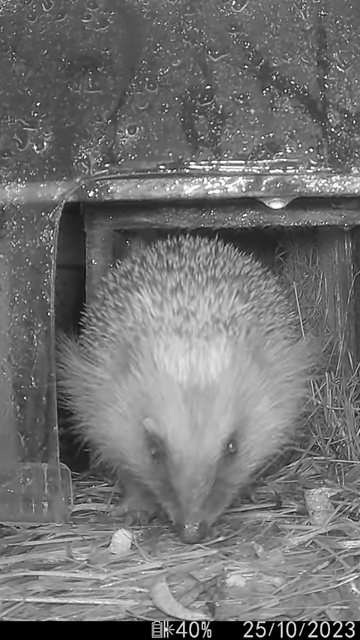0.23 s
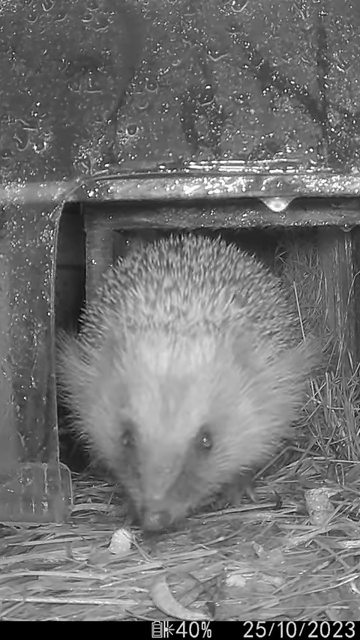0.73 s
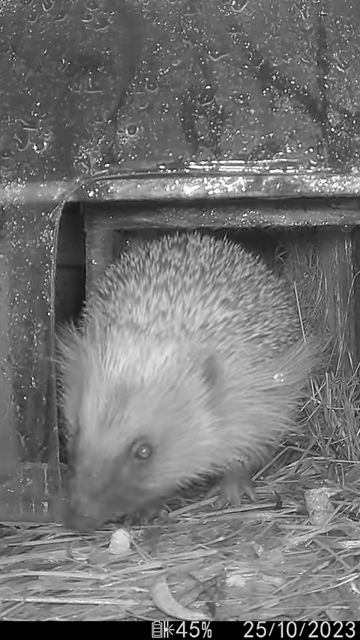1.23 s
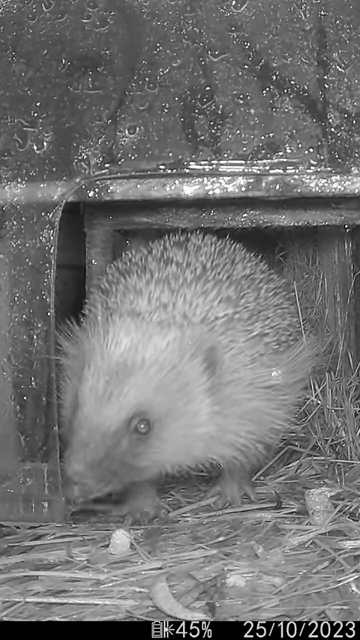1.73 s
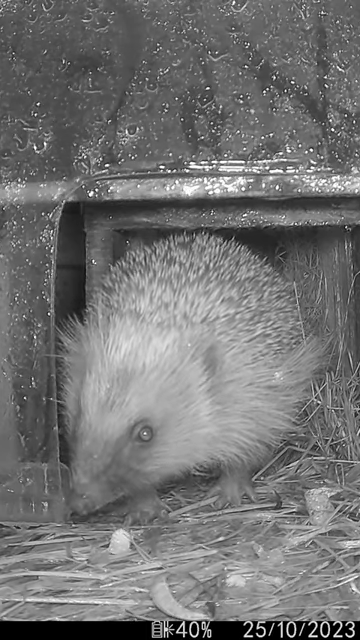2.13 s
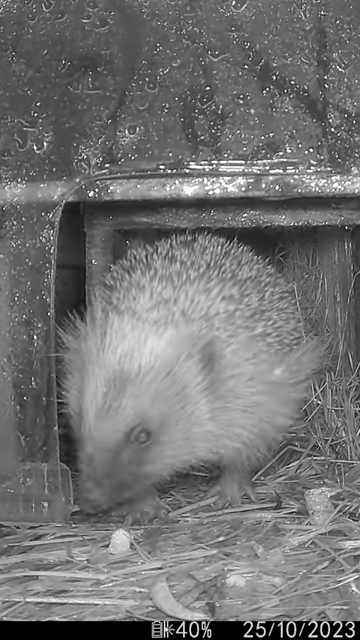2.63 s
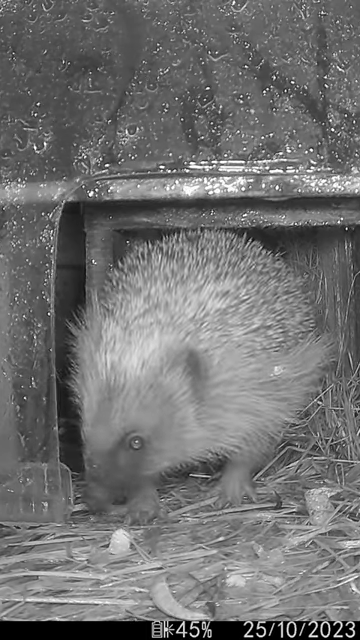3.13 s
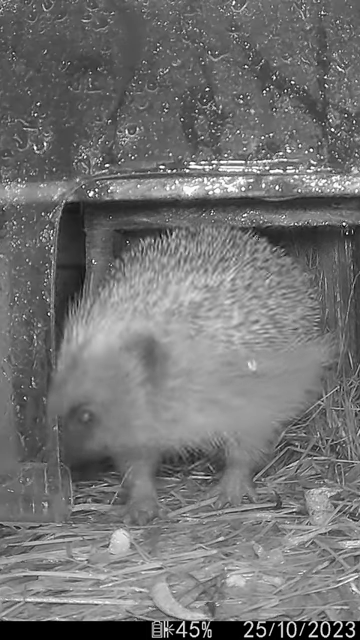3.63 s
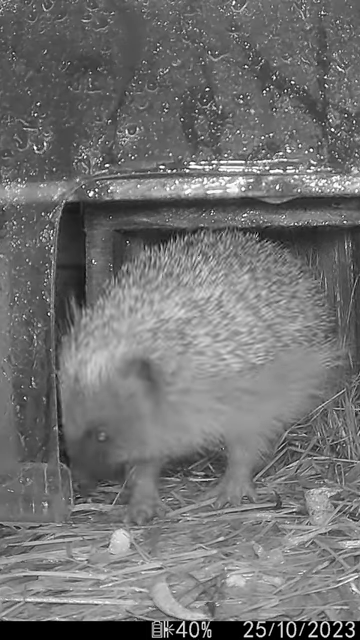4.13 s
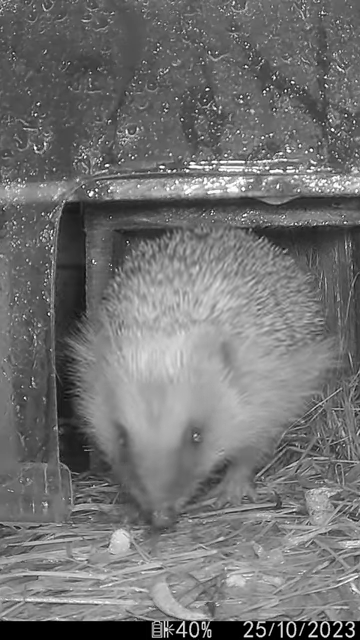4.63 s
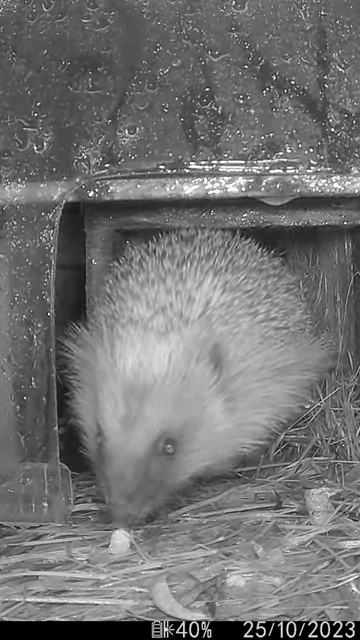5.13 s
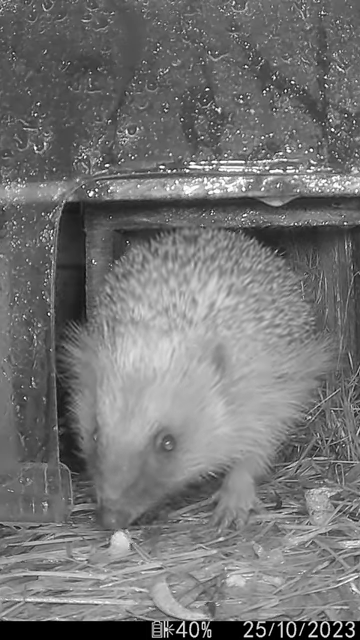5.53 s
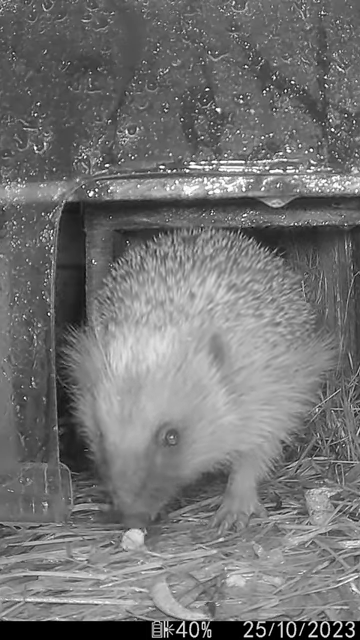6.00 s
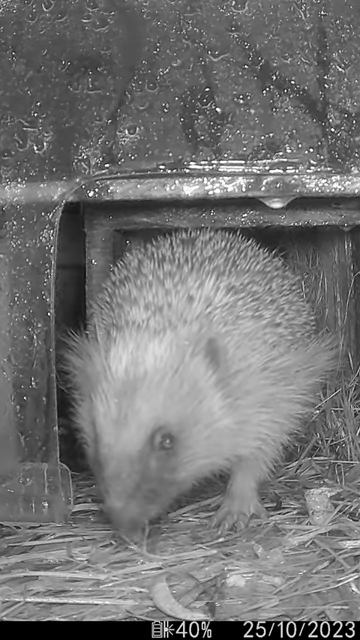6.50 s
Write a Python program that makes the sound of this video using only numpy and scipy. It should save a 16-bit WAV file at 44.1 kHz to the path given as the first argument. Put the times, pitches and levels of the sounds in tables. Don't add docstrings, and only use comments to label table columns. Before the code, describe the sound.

Inside a small wooden box at night, a hedgehog moves in dry straw, close to a small microphone. Right away, at 0.1-0.25 s, stout stalks crack over soft low thuds on the floor board, then a bright, thin ping at 0.6 s. Fine rustling of tiny cracks continues with light ticks and knocks until about 1.5 s, when a sharp hollow snap and thud start another cluster lasting to roughly 2.15 s. A quieter stretch of rustle follows, with single snaps near 2.8, 3.1 and 3.4 s. From 3.7 to 4.1 s comes the densest, loudest burst: rapid cracks, crunchy rustle, thumps and a woody ping at 4 s. It settles quickly by 4.5 s. The rest is nearly still: faint ticks, a small snap cluster around 5.7-5.9 s, a tiny one at 6.7 s, over steady air noise and hiss. Echo is short and boxy.

```python
import sys
import numpy as np
from scipy import signal
from scipy.fft import rfft, irfft, next_fast_len
from scipy.io import wavfile
from scipy.ndimage import uniform_filter1d

SR = 44100
rng = np.random.default_rng(int(sys.argv[2]) if len(sys.argv) > 2 else 0)


def master_out(mix):
    frames = np.transpose(np.atleast_2d(mix))
    ceiling = np.clip(frames, -1, 1)
    pcm = np.round(ceiling * 32767).astype(np.int16)
    wavfile.write(sys.argv[1], SR, pcm)


def undo_db(level):
    steps = np.asarray(level, float) / 20
    return 10 ** steps


N = 298097
ECHO_SIZE = 8192
CUT_HZ = 15480

# start in seconds, crack in dB, hollowness in dB, brightness in dB.
SNAPS = [(.13, -31.5, 1.5, -4.5), (.196, -26.5, -5.5, -16), (.247, -48.5, -4, 11), (.38, -40.5, -4, -12),
         (0.601, -42.5, -11, 12), (.629, -40.5, -9.5, 3), (.864, -43, -0.5, -24), (1.115, -46, -43, 4),
         (1.515, -30, -1, -11.5), (1.559, -44, -0.5, -18), (1.761, -33, -10, -21), (1.902, -36, -4.5, -3.5),
         (1.938, -36, -0.5, -5), (1.969, -41, -11, -20), (2.015, -32, -1, -5.5), (2.148, -44, -9, -0.5),
         (2.758, -37, -3, -6), (2.837, -40, -2.5, -10), (3.134, -35, -7, -1), (3.439, -43.5, -2, -14),
         (3.735, -29.5, 0.5, -4.5), (3.754, -30.5, -14, -26), (3.788, -33, -7, 1), (3.808, -31.5, -1.5, -6),
         (3.8875, -23.5, -1, -5), (3.938, -34.5, -9, -6), (3.998, -25.5, 0, -16), (4.1071, -29, -1.5, -5),
         (5.861, -45, -3, -7), (6.685, -42.5, -4, -8)]


def at_hz(points, hz):
    point_hz, point_db = np.transpose(points)
    return np.interp(np.log(hz + 1), np.log(point_hz), point_db)


def band(x, low_hz, high_hz):
    return signal.sosfilt(signal.butter(3, [low_hz, high_hz], "band", fs=SR, output="sos"), x)


def rms_one(x):
    return x / np.sqrt(np.mean(x ** 2) + 1e-20)


def box_colour(count):
    # centre in Hz, width in Hz, height in dB.
    box_modes = [(199, 83, -3), (549, 52, 2.5), (816, 74, -2), (1165, 46, -4.5), (1438, 79, 1),
                 (1772, 91, -2), (2080, 100, 1), (2263, 45, -2), (2538, 42, 1), (2875, 174, -3),
                 (3163, 55, -2), (3900, 410, -7), (4730, 270, -7)]
    # frequency in Hz, level in dB per Hz.
    straw_colour = [(30, -53), (90, -8.5), (340, -18.5), (450, -4.5), (640, -4), (900, -7), (1050, -10.5),
                    (1930, -8), (2200, -8.5), (5200, -6.5), (8300, -17.5), (9200, -22.5), (15500, -36)]
    hz = np.arange(ECHO_SIZE + 1) * SR / ECHO_SIZE / 2
    centre, width, db = np.transpose(box_modes)[:, :, None]
    peaks = undo_db(2 * db) / (1 + (2 * (hz - centre) / np.maximum(width, 45)) ** 2) ** 2
    strength = undo_db(rng.uniform(-8, 4, (10, len(db))))
    power = undo_db(2 * at_hz(straw_colour, hz)) + strength @ peaks
    cepstrum = irfft(np.log(power) / 2)
    cepstrum[:, 1:ECHO_SIZE] *= 2
    cepstrum[:, ECHO_SIZE + 1:] = 0
    return np.exp(rfft(cepstrum))[np.arange(count) % 10]


def box_echoes(count, direct_db=10.0, first_t60=0.16, second_db=1.5, second_t60=0.098):
    t = np.arange(ECHO_SIZE) / SR
    white = rng.standard_normal((count, ECHO_SIZE))
    white[:, :8] += undo_db(direct_db) * np.hanning(8)
    dying = white * (undo_db(-60 * t / first_t60) + undo_db(second_db - 60 * t / second_t60))
    return irfft(rfft(dying, 2 * ECHO_SIZE) * box_colour(count))[:, :ECHO_SIZE]


def struck(times, levels_db, echoes):
    out = np.zeros(N + ECHO_SIZE)
    for s, db, echo in zip(times, levels_db, echoes):
        at = int((s + .0008) * SR)
        out[at:at + ECHO_SIZE] += undo_db(db) * echo / np.std(echo[:SR // 100])
    return out[:N]


def crackle(per_s, spread_db, low_hz, high_hz):
    sizes = undo_db(spread_db * np.minimum(rng.exponential(1, N), 3)) * rng.choice([-1, 1], N)
    happens = rng.random(N) < per_s / SR
    cracks = sizes * happens * (rng.integers(0, 6, N) == np.arange(6)[:, None])
    echoes = band(box_echoes(count=6), low_hz, high_hz)
    size = next_fast_len(N + ECHO_SIZE)
    echoing = (rfft(cracks, size) * rfft(echoes, size)).sum(0)
    return rms_one(irfft(echoing, size)[:N])


def settling():
    settle_db, settle_t60_s = -13, 0.44
    s, crack = np.transpose(SNAPS)[:2]
    kicks = np.full(N, 1e-18)
    kicks[(s * SR).astype(int)] = undo_db(2 * (crack + settle_db))
    return signal.lfilter([1], [1, -undo_db(-2 * 60 / (settle_t60_s * SR))], kicks)


def shuffle():
    # start in seconds, stir of the straw in dB, weight on the board in dB.
    movements = [(0, -52.5, -3), (.3, -51.5, -1), (.5, -53, -5.5), (.7, -51.5, -1), (1.2, -55, -0.5),
                 (1.4, -53, 1), (1.86, -49, -1), (2.2, -49.5, -2), (2.46, -54.5, -1), (2.6, -51.5, -3),
                 (3.02, -55, 1.5), (3.27, -50, -1), (3.56, -61, 0.5), (3.82, -42, -3.5), (4.3, -51, 1.5),
                 (4.9, -64, -1.5), (5.7, -65.5, -4.5), (6.1, -60, 3.5)]
    rumble_db, coarse_db, sizzle_db = -3.5, -1.55, -11
    rumble_follows, sizzle_follows = 1.33, 0.85
    quiet_fade_db = -59.5
    s, *controls = np.transpose(movements)
    stir, weight = (np.interp(np.arange(N) / SR, s, db) for db in controls)
    stir = 10 * np.log10(undo_db(2 * stir) + settling())
    swing = stir - np.mean(stir)
    rumble = undo_db(stir + rumble_db + (rumble_follows - 1.5) * swing + weight)
    coarse = undo_db(stir + coarse_db + weight)
    resting = 2.5 * np.minimum(stir - quiet_fade_db, 0)
    sizzle = undo_db(stir + sizzle_db + (sizzle_follows - 1) * swing + resting)
    return (rumble * crackle(400, 1.0, low_hz=95, high_hz=323)
            + coarse * crackle(200, 3.6, low_hz=365, high_hz=1840)
            + undo_db(stir) * crackle(400, 0.82, low_hz=2150, high_hz=8000)
            + sizzle * crackle(600, 4.2, low_hz=8300, high_hz=15400))


def hush():
    # frequency in Hz, level in dB.
    hush_colour = [(12, -30), (20, 1.5), (148, -3), (372, -11.5), (534, -13), (1450, -13), (1920, -16),
                   (3850, -8), (8400, -18), (15500, -35)]
    hush_db = -54.5
    hz = np.arange(N // 2 + 1) * SR / N
    coloured = rfft(rng.standard_normal(N)) * undo_db(at_hz(hush_colour, hz))
    return undo_db(hush_db - 5.5) * rms_one(irfft(coloured, N))


def snaps():
    # start in seconds, crack in dB, hollowness in dB.
    blade_cracks = [(.001, -47, -1), (.118, -45, -15), (.332, -45, -5), (.438, -48, -3), (0.719, -44, -6.5),
                    (0.958, -44.5, -5), (1.078, -46, -18), (1.999, -43, -25), (2.267, -42.5, -15),
                    (2.503, -49, -4.5), (2.545, -51, -3.5), (2.939, -46.5, -8), (3.083, -52, -16),
                    (3.253, -53, -14), (3.537, -51.5, -11), (3.856, -43, 2), (4.497, -42.5, -4),
                    (5.6, -54.5, -4.5), (5.737, -43.5, -21), (6.045, -51, -7), (6.09, -51, -17),
                    (6.38, -49, -9), (6.548, -52.5, -7), (6.664, -52, -5.5)]
    # start in seconds, crack in dB, hollowness in dB.
    bundle_knocks = [(.525, -55.5, 13.5), (.744, -48, -0.5), (.901, -49.5, -1), (.928, -52, 9.5),
                     (1.099, -54.5, 7), (1.185, -52.5, 3.5), (1.296, -56, 12), (1.482, -60, 10),
                     (2.099, -49, 4.5), (2.187, -61.5, 17), (2.226, -62.5, 13.5), (2.389, -54, 3),
                     (2.885, -51.5, 3), (2.919, -49, 2), (3.06, -53, 3), (3.404, -51.5, -9),
                     (3.496, -53, 1.5), (4.242, -59, 7.5), (4.356, -63, 11), (4.374, -52.5, 0),
                     (4.528, -47.5, -4), (4.949, -60, 1.5), (5.196, -56, 1.5), (6.128, -52.5, -3),
                     (6.159, -61, 7), (6.442, -53.5, -0.5)]
    # start in seconds, crack in dB, hollowness in dB.
    tip_ticks = [(.693, -50, 0), (1.038, -50, -2), (1.244, -47, -13), (1.269, -47, -3), (1.825, -51.5, 6),
                 (2.074, -47, -8), (2.595, -52, 2), (2.665, -66, -11), (2.691, -52, -7), (3.22, -55.5, 4),
                 (3.728, -46.5, 0), (3.988, -35, -0.5), (4.081, -44.5, -15), (4.423, -61, -17),
                 (4.661, -53.5, -9), (4.76, -57.5, -2), (5.503, -60.5, -3), (5.984, -58, -4),
                 (6.713, -52.5, -29)]
    knock_bright_db, crack_bright_db, tick_bright_db = -10.5, -13.5, 0
    spit_db, spit_follows = -3, 0.36
    rows = list(SNAPS)
    rows += [(s, db, hollow, hollow + knock_bright_db) for s, db, hollow in bundle_knocks]
    rows += [(*row, crack_bright_db) for row in blade_cracks]
    rows += [(*row, tick_bright_db) for row in tip_ticks]
    s, crack, hollow, bright = np.transpose(rows)
    near, far = box_echoes(count=len(s)), box_echoes(count=len(s))
    return (struck(s, crack + hollow + 2.8, band(near, low_hz=317, high_hz=1230))
            + struck(s, crack + 0.95, band(far, low_hz=1080, high_hz=3790))
            + struck(s, crack + bright + 0.23, band(near, low_hz=3720, high_hz=6570))
            + struck(s, crack + spit_db + spit_follows * bright, band(far, low_hz=6420, high_hz=18200)))


def thuds(rise_s=0.0016):
    # start in seconds, peak in dB, pitch in Hz, t60 in seconds.
    footfalls = [(.122, -25, 227, 0.059), (0.177, -28.5, 178, 0.1), (0.523, -37.5, 216, 0.067),
                 (.904, -34.5, 140, .11), (1.255, -47.5, 199, 0.17), (1.452, -46, 140, .08),
                 (1.513, -23.5, 220, 0.026), (1.673, -34.5, 150, 0.071), (1.817, -48, 170, 0.086),
                 (1.898, -29.5, 190, 0.027), (1.933, -33.5, 139, .095), (2.008, -28.5, 230, 0.036),
                 (2.136, -42, 181, 0.081), (2.751, -34, 224, 0.034), (3.059, -43, 180, 0.07),
                 (3.127, -29.5, 222, 0.056), (3.434, -44.5, 216, 0.065), (3.493, -32.5, 168.5, 0.082),
                 (3.728, -33.5, 219, 0.15), (3.786, -25, 167, 0.14), (3.886, -25, 153, 0.04),
                 (3.993, -32, 207, 0.072), (4.104, -28, 207, 0.041), (4.173, -38, 182, .11),
                 (4.25, -41, 156, 0.23), (4.371, -37, 146, .093), (4.491, -41, 153, 0.083),
                 (5.857, -43, 160, .043), (6.464, -54, 170, 0.14), (6.682, -42, 225, 0.067)]
    s, peak, hz, t60 = np.transpose(footfalls)
    t = np.arange(ECHO_SIZE) / SR
    uneven = rms_one(band(rng.standard_normal((len(s), ECHO_SIZE)), 59, 298))
    swing = np.sin(2 * np.pi * hz[:, None] * t) + 0.48 * uneven
    dying = undo_db(-60 * t / np.clip(t60, .03, .3)[:, None])
    return struck(s + 0.00461, peak - 5.0, swing * (1 - np.exp(-t / rise_s)) * dying)


def pings(spread=1.163):
    # start in seconds, peak in dB, pitch in Hz.
    thin_stalks = [(0.2456, -23, 5020), (0.599, -14.5, 5020), (2.2665, -35, 2180), (0.629, -25.5, 4200),
                   (0.798, -43, 8400), (1.046, -42, 4500), (1.599, -44, 8160), (1.998, -31, 5150),
                   (4.4243, -36.5, 5350), (5.24, -52, 6640), (5.4594, -49, 8330), (5.984, -46, 5760),
                   (6.4407, -42.5, 5300), (5.738, -37, 4560)]
    # start in seconds, peak in dB, pitch in Hz.
    thick_joints = [
        (1.5151, -22, 1156),
        (3.9979, -20, 1410),
        (5.74, -37.5, 1410),
        (6.3777, -38, 1220),
    ]
    # start in seconds, peak in dB.
    chaff_hisses = [(0.5482, -50), (0.983, -38.5), (0.998, -47), (1.272, -42), (2.573, -45), (3.262, -53),
                    (3.676, -54), (4.4194, -52), (4.6154, -55), (4.8264, -55), (5.4515, -57), (5.9994, -51),
                    (6.1265, -59), (6.5226, -56)]
    s, peak, hz = np.transpose(thin_stalks + thick_joints)
    echoes = box_echoes(count=len(s), second_db=1.0, second_t60=0.17)
    slices = [band(echo, f / spread, f * spread) for f, echo in zip(hz, echoes)]
    at, db = np.transpose(chaff_hisses)
    chaff = band(box_echoes(count=len(at)), low_hz=9750, high_hz=17600)
    return struck(s, peak - 11.0, slices) + struck(at, db - 9.0, chaff)


def dipped(x):
    # centre in Hz, width in Hz, depth in dB.
    wall_dips = [(608, 69, -6.5), (1064, 33, -1.5), (1935, 134, -7.5), (2300, 71, -1.5)]
    for hz, width_hz, db in wall_dips:
        c, a = -2 * np.cos(2 * np.pi * hz / SR), np.pi * width_hz / SR
        x = signal.lfilter([1 + a * undo_db(db), c, 1 - a * undo_db(db)], [1 + a, c, 1 - a], x)
    return x


def scene():
    board = band(thuds(), low_hz=71, high_hz=2000)
    return dipped(snaps() + pings() + board + shuffle() + hush())[None]


def starved(top, share, depth_db):
    hz, t, cells = signal.stft(top, SR, nperseg=1024)
    dice = rng.random((len(hz) // 5 + 1, len(t) // 3 + 1))
    dice = np.kron(dice, np.ones((5, 3)))[:len(hz), :len(t)]
    holes = dice < share * (hz[:, None] / CUT_HZ) ** 2
    return signal.istft(cells * np.where(holes, undo_db(depth_db), 1), SR, nperseg=1024)[1][:N]


def band_limit(x):
    return signal.sosfilt(signal.butter(12, 15680, fs=SR, output="sos"), x)


def record(dry):
    # start in seconds, end in seconds.
    treble_drops = [(.115, .208), (.595, .622), (1.237, 1.263), (1.495, 1.52), (1.753, 1.776),
                    (1.875, 1.93), (2.741, 2.768), (3.123, 3.15), (3.7, 3.76), (3.86, 3.92), (3.987, 4.015),
                    (4.083, 4.112), (5.716, 5.745), (5.844, 5.871), (6.356, 6.385)]
    top_hz = 8700
    kept, t = np.ones(N), np.arange(N) / SR
    for start, end in treble_drops:
        kept[(t > start) & (t < end)] = undo_db(-40.0)
    hz = np.arange(N // 2 + 1) * SR / N
    spectrum = rfft(dry)
    below = irfft(spectrum * (hz <= top_hz), N)
    top = irfft(spectrum * (hz > top_hz) * (hz < CUT_HZ), N)
    top = starved(top[0], share=0.37, depth_db=-28.0)
    mix = below + top * uniform_filter1d(kept, size=100)
    return band_limit(mix)


dry = scene()
out = record(dry)
master_out(out)
```